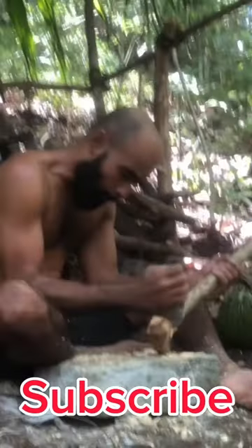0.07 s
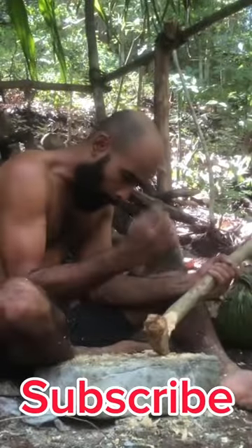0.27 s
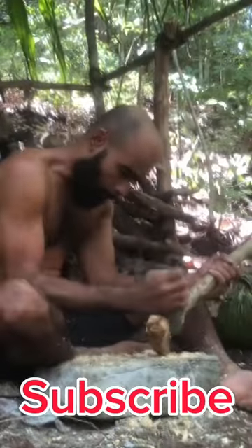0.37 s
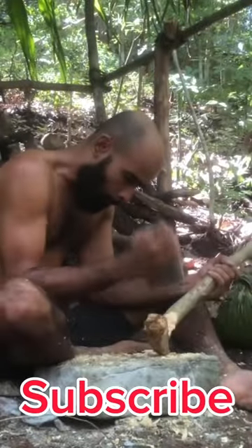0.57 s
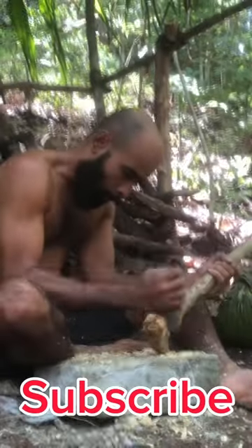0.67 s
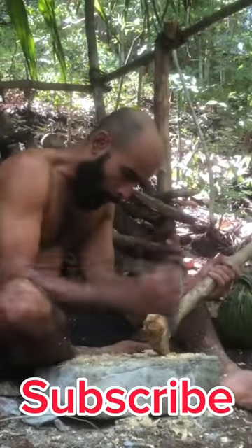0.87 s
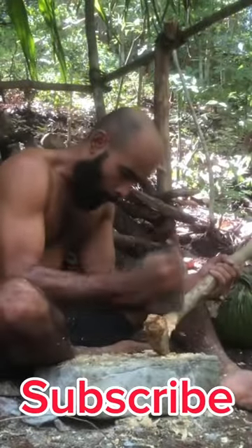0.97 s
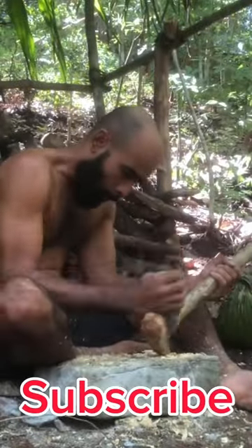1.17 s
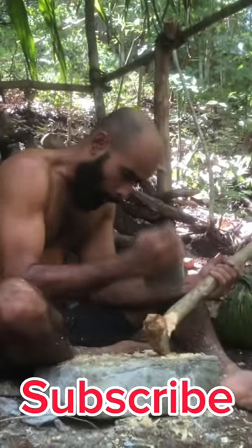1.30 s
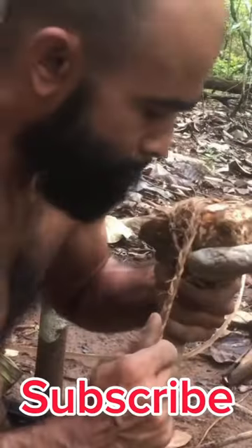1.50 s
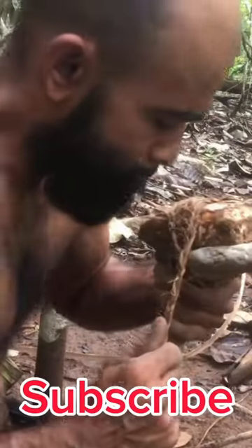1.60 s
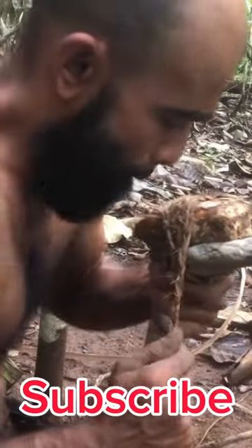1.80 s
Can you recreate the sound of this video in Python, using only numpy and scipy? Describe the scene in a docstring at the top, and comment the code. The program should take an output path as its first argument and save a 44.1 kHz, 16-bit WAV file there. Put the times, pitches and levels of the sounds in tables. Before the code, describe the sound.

In a forest hissing with insects, four quick, sharp chops of stone on wood ring out, the last two softer. The sound cuts out briefly, then a faint ping follows and the insects carry on louder.

```python
"""Four sharp chops sound over a fading echo and the hiss of forest insects: a stone tool strikes a branch.
Each impact splits fibres, excites the damped modes of the wood and drives it against a rock with a thud.
The ground and nearby stems scatter the sound, and the trees return a soft echo.
After a short silence the forest is heard from another spot, with louder insects, a faint ping and a tick."""
import sys
import numpy as np
from scipy import signal
from scipy.fft import rfft, irfft, next_fast_len
from scipy.io import wavfile
from scipy.ndimage import map_coordinates

SR = 44100
rng = np.random.default_rng(int(sys.argv[2]) if len(sys.argv) > 2 else 0)


def unload_audio(sound):
    """Save the sound as a 16-bit wav file, at the path given as the first command line argument."""
    columns = np.transpose(np.atleast_2d(sound))
    # keep every value between -1 and 1, then stretch to whole-number steps
    steps = np.round(np.clip(columns, -1, 1) * 32767)
    wavfile.write(sys.argv[1], SR, steps.astype(np.int16))


N = 81585
TIME, AGE, LONG_AGE = np.arange(N) / SR, np.arange(6000) / SR, np.arange(24000) / SR

# The blows. Each row: start in seconds, level in dB, tilt in dB per octave, grip from firm 0 to loose 1,
# hollow knock in Hz, its relative level in dB, delay of the second contact in seconds, its relative level
# in dB, bark level in dB, thud delay in seconds, thud level in dB, ground level in dB, relative scatter
# level in dB, relative echo level in dB. Relative levels are added to the level of the blow.
BLOWS = [(0.2414, -19.5, 0, 0, 796, 5.5, .003, -2.5, -56.5, 0.0083, -29, -40, 0.5, -18),
         (0.527, -21, 1.6, 0.089, 567, 1, 0.002, -4, -58.5, 0.02, -42, -38, -3, -18),
         (.7811, -27, -1.6, 0.84, 760, -16, .0095, -5, -62, .0145, -30, -63, 3, -19),
         (1.0554, -26, -0.5, 1, 820, 2, .0095, -4, -57, 0.01347, -28.5, -43, 2, -14.5)]
# Modes of branch and tool. Each row: frequency in Hz, t60 in seconds, relative dB held firm and held loose.
WOOD_MODES = [(285, 0.054, -16.5, -7), (436.6, .07, -18, -7), (518, 0.063, -15, -11),
              (737.6, 0.1, -11.5, -7), (902, 0.023, -7, -10.5), (1000, 0.074, -22.5, -11.5),
              (1181, 0.077, -16.5, -10), (1270.5, 0.094, -8.5, -28), (1543, 0.029, 2, 3),
              (1720, 0.0401, -11.5, -36), (1993, .032, -2, -20), (2245, 0.034, 0, -2.5),
              (2450, 0.04, -11.5, -4.5), (2728, 0.025, -20.5, -1.5), (2912, 0.017, -18, -38),
              (3683, .035, -16, -14.5)]
# Noise bands. Each row: centre in Hz, relative level in dB, rise time in seconds, t60 in seconds.
FIBRE_BANDS = [(197, -20, 0.0016, 0.031), (420, -7.5, 0.0019, 0.045), (840, -2.5, 0.00022, .022),
               (1400, -8, .0003, 0.022), (2420, -5.5, 0.000094, 0.021), (3920, -16, .0001, 0.019),
               (7000, -24.5, 0.00012, .014), (13030, -36, 0.00011, 0.0074)]  # splitting fibres
BARK_BANDS = [(3000, -6.5, .0004, .015), (5960, -0.5, 0.00032, .015), (12960, 11, .0004, .018)]  # tearing bark
SCATTER_BANDS = [(250, -9.5, .008, 0.054), (700, -12.5, .006, 0.1), (1800, -24, .005, 0.11),
                 (4000, -44.5, 0.003, 0.18), (12000, -43, .003, 0.12)]  # reflections from the ground and nearby stems
ECHO_BANDS = [(120, -17, 0.038, 0.46), (590, -17, .04, .55), (1280, -10.5, .05, .5),
              (2170, -19, 0.037, 0.49), (3600, -28.5, 0.04, 0.23), (7000, -41.5, .03, .35)]  # reflections from the trees
# The branch on the rock. Each row: frequency in Hz, relative level in dB, rise time and t60 in seconds.
THUD_MODES = [(125, -1, .002, 0.063), (233.2, -5, 0.0012, 0.045), (313, -4.5, 0.0015, 0.031)]
# Contacts of chips and bark. Each row: start in seconds, level in dB, tilt in dB per octave.
CHIP_TICKS = [(0.5722, -40.5, -3.5), (1.117, -59, 5), (1.755, -64.5, 5)]
# Spectra of the air at each spot and of the insects. Each row: frequency in Hz, relative density in dB.
FIRST_AIR_SPECTRUM = [(20, -41), (50, -12), (90, -3), (200, -10), (600, -19.5), (1500, -24.5), (4500, -35),
                      (9000, -42), (15000, -48.5)]
SECOND_AIR_SPECTRUM = [(20, -18.5), (80, -1), (150, -5.5), (240, -2.5), (500, -9), (1000, -14.5),
                       (3000, -21), (5000, -25), (10000, -30), (15000, -32.5)]
INSECT_SPECTRUM = [(4800, -55), (5600, -28), (6100, -12.5), (6550, -5.5), (6950, -4.5), (7400, -9),
                   (7900, -26.5), (9200, -35.5), (11000, -67)]


def chops(earlier_s=0.11, earlier_db=-34.5):
    """Impact excitation: the edge bites twice, the branch thuds on the rock, the surroundings reflect."""
    wood, around = np.zeros(N), np.zeros(N)
    thud = sum(amp(db) * tone(hz, rise, t60) for hz, db, rise, t60 in THUD_MODES)
    ground = tone(hz=50.6, rise=0.02, t60=0.11, age=LONG_AGE)
    for (start, db, tilt_db, loose, hollow_hz, hollow_db, second_s, second_db, bark_db,
         thud_s, thud_db, ground_db, scatter_db, echo_db) in BLOWS:
        knock = amp(hollow_db) * tone(hollow_hz, rise=0.00023, t60=0.029)
        blow = burst(FIBRE_BANDS, tilt_db) + wood_ring(tilt_db, loose) - knock
        add(wood, start, amp(db) * blow)
        add(wood, start, amp(bark_db + 1) * burst(BARK_BANDS))  # the first contact tears more bark
        add(wood, start + second_s, amp(db + second_db) * burst(FIBRE_BANDS, tilt_db))
        add(wood, start + second_s, amp(bark_db) * burst(BARK_BANDS))
        add(around, start + second_s, amp(db + scatter_db) * burst(SCATTER_BANDS, tilt_db))
        add(around, start + thud_s, amp(thud_db) * thud)
        add(around, start + thud_s, amp(ground_db) * ground)
        add(around, start + 0.025, amp(db + echo_db) * tree_echo(tilt_db))
    add(around, 0, amp(earlier_db) * tree_echo()[round(earlier_s * SR):])  # an earlier blow still fades
    return disperse(wood) + around


def wood_ring(tilt_db, loose, spread_db=1.04):
    """Modal superposition: the wood rings as a sum of damped modes, and the grip sets their strengths."""
    out = 0
    for k, (hz, t60, firm_db, loose_db) in enumerate(WOOD_MODES):
        db = firm_db + loose * (loose_db - firm_db) - spread_db * rng.normal()
        out += (-1) ** k * amp(db) * tilt_gain(hz, tilt_db) * tone(hz, rise=0.0002, t60=t60)
    return out


def disperse(x, lag_cycles=0.9, corner_hz=50):
    """Dispersion of bending waves: low frequencies travel more slowly, so each knock falls in pitch."""
    return filtered(x, lambda hz: np.exp(-2j * np.pi * lag_cycles * np.log1p(hz / corner_hz)))


def tree_echo(tilt_db=0):
    """Diffuse reflection: returns from many trees merge into a soft tail of noise."""
    return burst(ECHO_BANDS, tilt_db, LONG_AGE)


def ticks():
    """Light impacts of chips and bark give small, dry broadband transients."""
    out = np.zeros(N)
    for start, db, tilt_db in CHIP_TICKS:
        add(out, start, amp(db) * burst(FIBRE_BANDS, tilt_db))
    return disperse(out)


def ping(start=1.2955, db=-43):
    """Free decay of a single resonance gives one faint, short note."""
    out = np.zeros(N)
    add(out, start, amp(db) * tone(hz=1168, rise=0.00044, t60=0.064))
    return out


def forest(air_spectrum, air_db, insects_db, flutter_db=0.5, flutter_per_s=72):
    """Incoherent summation: many insects merge into a narrow, fluttering hiss above the distant air."""
    flutter = map_coordinates(rng.standard_normal(1024), [TIME * flutter_per_s], mode="mirror")
    air = amp(air_db) * noise(air_spectrum)
    insects = amp(insects_db + flutter_db * flutter) * noise(INSECT_SPECTRUM)
    return air + insects


def burst(bands, tilt_db=0, age=AGE):
    """Frequency-dependent decay: one noise is split into overlapping bands, each with its own envelope."""
    freqs = np.fft.rfftfreq(len(age), 1 / SR)
    log_centres = np.log([band[0] for band in bands])
    bass_cut = freqs ** 2 / (freqs ** 2 + (bands[0][0] / 2) ** 2)
    spectrum = rfft(rng.standard_normal(len(age))) * bass_cut
    out = 0
    for (hz, db, rise, t60), selector in zip(bands, np.eye(len(bands))):
        band = irfft(spectrum * np.interp(np.log(freqs + 1), log_centres, selector))
        shape = envelope(rise, t60, age)
        shape_rms = np.sqrt(np.mean(shape ** 2))
        out += amp(db) * tilt_gain(hz, tilt_db) * unit_rms(band * shape) * shape_rms
    return out


def tone(hz, rise, t60, age=AGE):
    """A damped harmonic oscillator."""
    return envelope(rise, t60, age) * np.sin(2 * np.pi * hz * age)


def envelope(rise, t60, age):
    """Exponential damping: after its rise, a vibration loses 60 dB every t60 seconds."""
    return (1 - np.exp(-age / rise)) * np.exp(-np.log(1000) * age / t60)


def tilt_gain(hz, tilt_db):
    """Spectral tilt about 1 kHz: a sharper contact excites more treble."""
    return amp(tilt_db * np.log2(hz / 1000))


def noise(spectrum):
    """Spectral shaping turns white noise into steady coloured noise of rms 1."""
    freqs, db = np.transpose(spectrum)
    white = rng.standard_normal(N)
    return unit_rms(filtered(white, lambda hz: amp(np.interp(np.log(hz + 1), np.log(freqs), db))))


def filtered(x, response):
    """Linear filtering multiplies the spectrum by a frequency response."""
    size = next_fast_len(len(x) + 8192)
    return irfft(rfft(x, size) * response(np.fft.rfftfreq(size, 1 / SR)), size)[:len(x)]


def add(track, start, sound):
    """Superposition: a sound adds to the track from its start in seconds."""
    part = track[round(start * SR):][:len(sound)]
    part += sound[:len(part)]


def amp(db):
    """Decibels as an amplitude ratio."""
    return 10 ** (np.asarray(db) / 20)


def unit_rms(x):
    """Normalisation to rms 1."""
    return x / np.sqrt(np.mean(x ** 2) + 1e-20)


def scene(silence_from_s=1.2515, silence_to_s=1.2952):
    """Sources superpose at the chopping spot and then, after a moment of silence, at a second spot."""
    first = chops() + forest(FIRST_AIR_SPECTRUM, air_db=-58.5, insects_db=-65.5)
    second = ping() + forest(SECOND_AIR_SPECTRUM, air_db=-66, insects_db=-60)
    return (first * (TIME < silence_from_s) + second * (TIME > silence_to_s) + ticks())[None]


def record(dry, low_hz=38, top_hz=15500):
    """Band limiting: the microphone loses the deepest bass, and nothing above top_hz is kept."""
    high_pass = signal.butter(4, low_hz, "highpass", fs=SR, output="sos")
    channels = signal.sosfilt(high_pass, dry)
    return np.array([filtered(channel, lambda hz: hz < top_hz) for channel in channels])


dry = scene()
out = record(dry)
unload_audio(out)
```